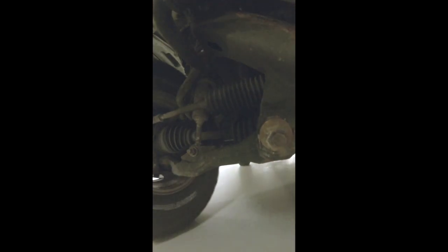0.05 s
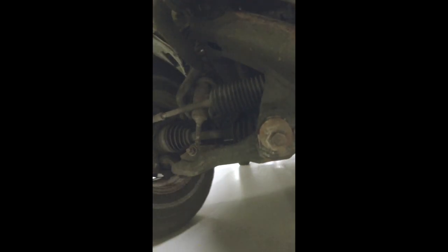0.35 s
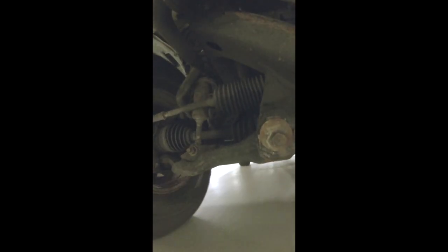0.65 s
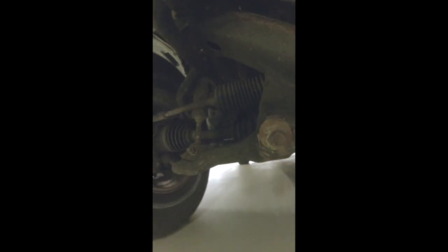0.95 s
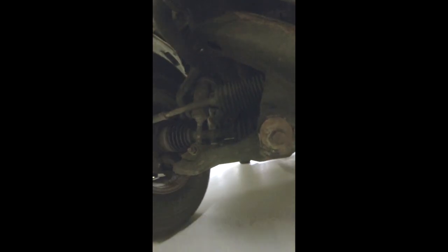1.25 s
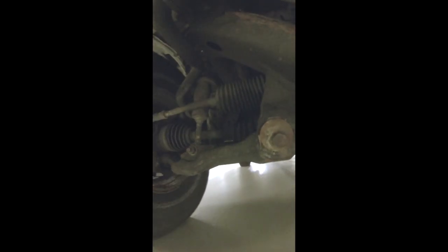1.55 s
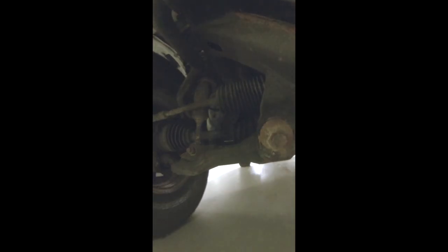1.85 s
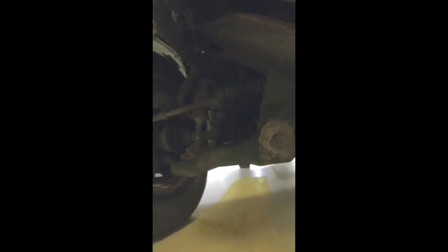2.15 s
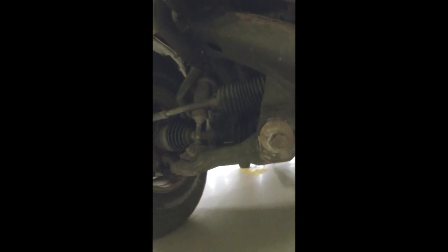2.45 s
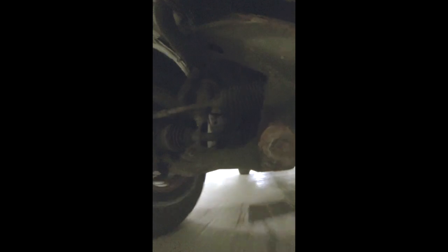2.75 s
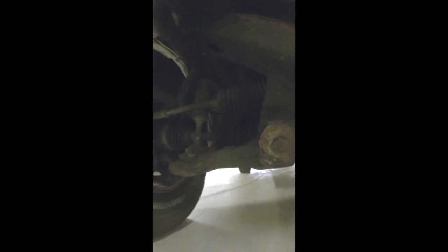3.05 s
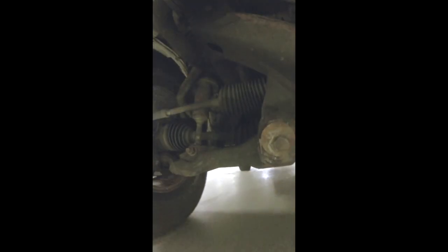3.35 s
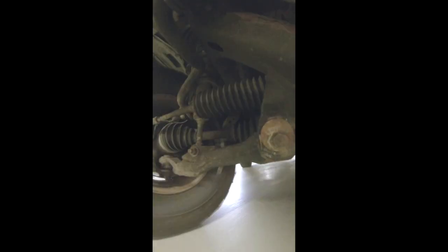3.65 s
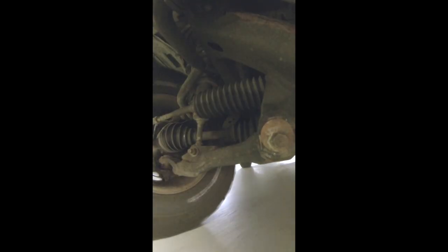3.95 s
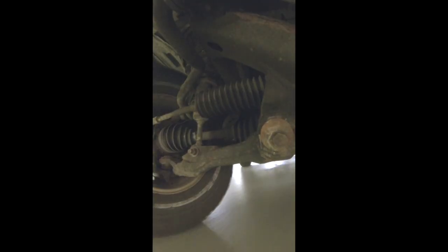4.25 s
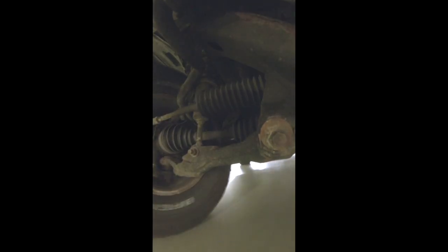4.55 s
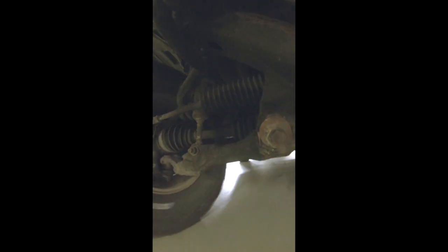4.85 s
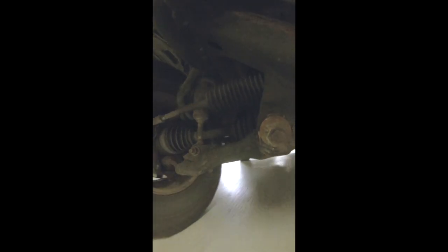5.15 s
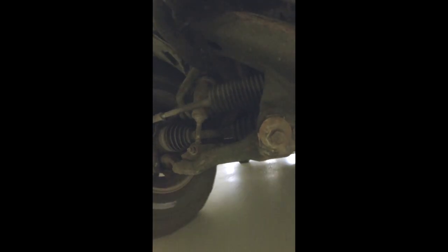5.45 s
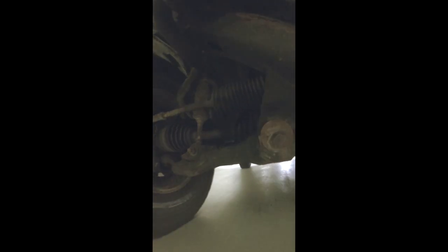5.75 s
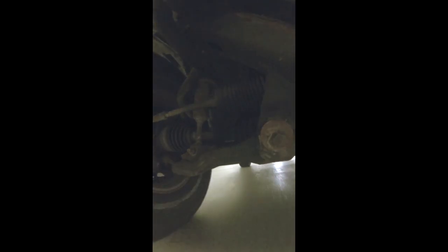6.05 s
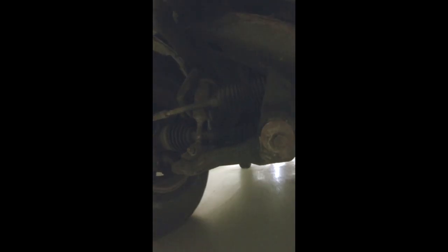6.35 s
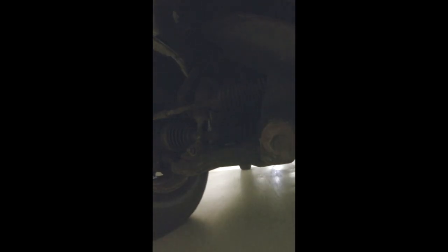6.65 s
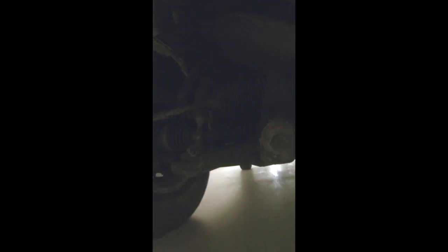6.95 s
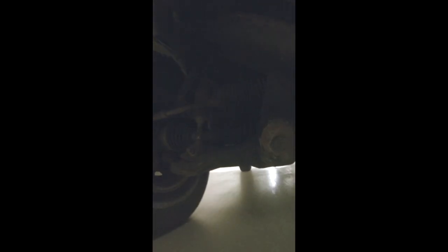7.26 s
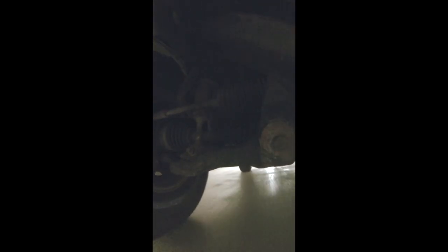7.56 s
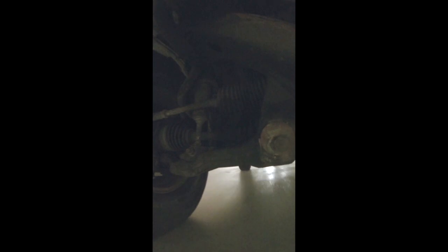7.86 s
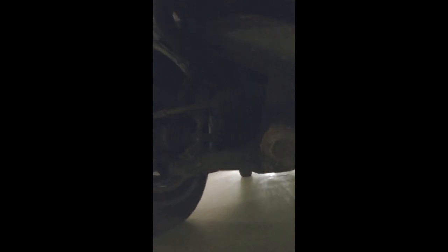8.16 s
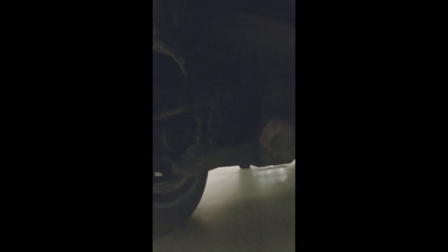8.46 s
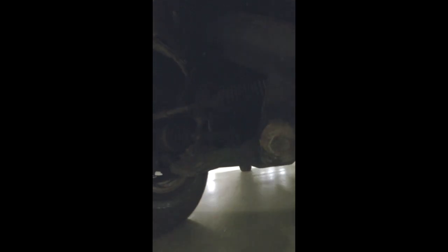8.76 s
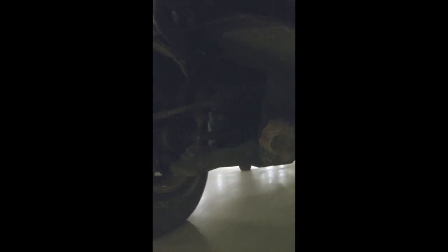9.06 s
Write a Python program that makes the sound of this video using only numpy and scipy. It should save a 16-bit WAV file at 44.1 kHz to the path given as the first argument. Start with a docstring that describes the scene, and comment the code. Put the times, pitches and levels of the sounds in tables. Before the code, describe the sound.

A car rolls around a concrete parking deck, the microphone underneath near a front wheel. Continuous tyre noise and a low engine hum, rising and falling with the throttle, carry a light whine and hiss. Five hard, briefly ringing metal clunks come from the suspension, the third and fifth loudest, making the background dip for a moment. Draughty rumbles come and go, with the deepest shudder near the end.

```python
"""A smooth concrete parking deck, heard from under the front suspension of a car driving round it.
A loose joint knocks five times, exciting the strut's modes; each hard knock makes a limiter duck everything.
The four-cylinder engine hums at multiples of its firing rate and falls in pitch at a gear change,
while its belts and gears whir, whine and hiss. The tyres roar on the concrete. Low rumbles swell over
a draught under the car; the last is a deep shudder, probably the wheel hopping."""
import sys
import numpy as np
from scipy import signal
from scipy.fft import rfft, irfft
from scipy.io import wavfile
from scipy.ndimage import uniform_filter1d, minimum_filter1d

SR = 44100
rng = np.random.default_rng(int(sys.argv[2]) if len(sys.argv) > 2 else 0)


def generate_wav(signal):
    """Clip the signal to [-1, 1] and save it as 16-bit WAV at the path in sys.argv[1]."""
    frames = np.transpose(np.atleast_2d(signal))
    scaled = np.clip(frames, -1, 1) * 32767
    pcm = np.round(scaled).astype(np.int16)
    wavfile.write(sys.argv[1], SR, pcm)


N = 410130
TIME = np.arange(N) / SR

# impacts in the joint: (time [s], peak before limiting [dB], contact cutoff [Hz], aftersound gain [dB])
IMPACTS = [(2.2663, 9.5, 2600, 2), (2.8019, 1.8, 1400, 6), (4.5134, 14, 5005, 3), (6.1374, 6, 2400, 5.5),
           (8.0451, 13, 3180, 4.5)]
# modes of the dead first blow and of the arm and strut: (frequency [Hz], level [dB], t60 [s])
BLOW_MODES = [(852, -7.5, 0.025), (1033, -5.5, 0.013), (1650, 1, 0.01), (1980, -11, 0.016),
              (4800, -20.5, 0.011)]
STRUT_MODES = [(598, -11, 0.15), (845, -10.5, 0.032), (1051, -4.5, 0.13), (1292, -11.5, 0.083),
               (1480, -37, 0.11), (1568, -16, 0.28), (1683, -2, 0.098), (1860, -9.5, 0.26),
               (1858, -16, 0.4), (2000, -10, 0.19), (2070, -7, 0.13), (2450, -15, 0.16), (2960, -17, 0.12),
               (3080, -21, 0.13), (3520, -14.5, 0.18), (4360, -28, .11), (4970, -35, .15)]
# engine speed, with a gear change at 3.6 s: (time [s], firing rate [Hz])
FIRING_RATE = [(0, 53.1), (1.35, 70.23), (1.7, 72.94), (2.18, 73.72), (3.3, 62.1), (3.52, 63), (3.66, 45),
               (3.98, 44.17), (4.4, 36.53), (4.72, 36.19), (5.25, 44.5), (5.6, 52.15), (5.8, 64.64),
               (5.97, 66.1), (6.95, 50.08), (8.2, 37.78), (9.3, 37.46)]
# throttle presses: (start [s], end [s], exhaust lift [dB], extra gain of the fundamental [dB])
PRESSES = [(0.0, 0.22, 12, 0.5), (0.323, 0.55, 12.5, 8), (0.803, 1.563, 14, 0.5), (3.773, 4.66, 13.5, -15),
           (4.86, 5.618, 14, -1), (6.51, 6.84, 14.5, -7)]
# exhaust harmonics 1-3: (level [dB], share of the lift [ratio], coasting rise above idle [dB/Hz])
EXHAUST_HARMONICS = [(-2, 1.42, 0.2054), (1, 1.16, 0.0273), (-2.5, 1.06, 0.5989)]
# weaker exhaust tones: (multiple of the firing rate [ratio], relative level [dB])
EXHAUST_OVERTONES = [(1.5, -7.5), (2.5, -19.5), (3.5, -16.5), (4, -11.5), (5, -10.5)]
# response of the car body to harmonics 1-3: (frequency [Hz], gain [dB])
BODY_RESPONSE = [(36, -11), (44, -7), (51, -1.5), (58, 2.5), (66, -.5), (73, 0), (85, -3.5), (103, 0.5),
                 (132, 1), (150, -5), (170, -8.5), (192, -6), (220, -18.5)]
# tones of the belt drive and gears: (multiple of the firing rate [ratio], relative level [dB])
WHINE_ORDERS = [(11, 1.5), (13, -2), (24, -5), (26.5, -32), (28, -8), (29.7, -9), (32, -6.5), (35, -6),
                (37, -10), (39, -4.5)]
# loudness of the engine bay: (time [s], whir gain [dB], hiss gain [dB])
BAY_GAINS = [(0, -23.5, -37.5), (0.3, -22.5, -38.5), (0.65, -25, -40.5), (1.35, -24.5, -39.5),
             (2.2, -19.5, -34), (2.6, -22, -37), (3.6, -20.5, -35), (4.6, -23, -40.5), (5.25, -21.5, -40.5),
             (5.52, -25, -40), (5.74, -20, -35.8), (6.1, -19, -33.5), (7.05, -20, -35.5), (8.6, -26, -40),
             (9.3, -23, -37)]
# the road under the tyres: (time [s], tread roar gain [dB], slab drumming gain [dB])
ROAD_GAINS = [(0, -21, -23), (0.7, -24.5, -25), (1.3, -23, -25.5), (2, -19.5, -26), (2.45, -21, -26.5),
              (3.5, -21.5, -26.5), (4.7, -25, -25), (5.3, -22.5, -20), (6.1, -20.5, -25.5),
              (7.5, -17.5, -24), (8, -17, -27.5), (8.4, -19.5, -39), (9.3, -18.5, -32)]
# low rumbling swells under the car, the last a deep shudder, probably the wheel hopping:
# (centre time [s], half-width [s], gain [dB], cutoff [Hz])
RUMBLE_SWELLS = [(2.05, 0.34, -27, 50), (3.022, .24, -15, 55), (3.8, 0.62, -26, 170),
                 (5.05, .3, -19.5, 200), (5.9, .3, -23, 60), (6.302, 0.27, -19, 150),
                 (7.657, .6, -17.5, 110), (8.25, 0.19, -9, 45.03)]
# gear tone of the final drive, following road speed: (time [s], frequency [Hz], gain [dB])
FINAL_DRIVE_TONE = [(0, 1620, -12), (3.75, 1590, -6), (4.9, 1680, 8), (5.6, 1650, -4), (6.4, 1660, -18),
                    (7, 1712, 2), (7.8, 1690, 7), (8.45, 1685, 4), (9.3, 1775, 5)]
# noise spectra: (frequency [Hz], relative spectral density [dB])
CLATTER_SPECTRUM = [(150, 0), (400, -25), (650, 0), (1000, -4), (1900, -5.5), (2600, -7), (3500, -11),
                    (5000, -16), (7000, -23), (14000, -33)]  # parts rattling around the joint
WHIR_SPECTRUM = [(600, -27), (1200, -10), (1450, -8.5), (1720, 0), (1910, -4), (2080, -2), (2350, -4),
                 (2650, -9.5), (3000, -7), (3800, -17.5), (4500, -25.5), (7000, -40)]  # engine bay
ROAR_SPECTRUM = [(120, 1.5), (200, -4.5), (310, -6.5), (430, -2.5), (560, -1.5), (660, -1), (712, 2.5),
                 (780, -1.5), (840, 0), (930, -5), (1040, -4), (1300, -10.5), (2200, -17)]  # tread on concrete
DRUM_SPECTRUM = [(40, -15), (60, 1), (73, -13), (88, -7), (125, 3.5), (170, -8), (250, -12)]  # tyres on the slabs
RUMBLE_SPECTRUM = [(8, -29), (20, -3), (30, -9), (45, -7), (70, -9), (120, -18), (200, -25.5), (400, -31)]  # draught and swells under the car
HISS_SPECTRUM = [(2500, -7), (3800, 4.5), (4400, -3.5), (5150, 1.5), (5900, -9), (6400, -6), (7000, -17.5),
                 (7500, -16.5), (8440, -2), (9400, -14), (10450, -8.5), (11800, -17.5), (14000, -19),
                 (15300, -27)]  # belts and air


def knocks(ring_db=-12, clatter_db=-22, clatter_t60=0.21, deck_db=-35, deck_t60=0.29, spread_s=0.00083):
    """Impact excitation: the joint takes up its play with a dead blow, then ring, clatter and deck echo."""
    t = np.arange(SR // 2) / SR
    fade = -np.log(1000) * t
    out = np.zeros(N + SR)
    for start, peak_db, cutoff_hz, aftersound_db in IMPACTS:
        strut = amp(ring_db) * ring(STRUT_MODES, t, scatter=0.92)
        tail = amp(clatter_db) * np.exp(fade / clatter_t60) + amp(deck_db) * np.exp(fade / deck_t60)
        aftersound = strut + tail * colour(rng.standard_normal(len(t)), CLATTER_SPECTRUM)
        aftersound *= 1 - np.exp(-t / spread_s)  # the shock takes a moment to reach nearby parts
        softness = signal.butter(2, cutoff_hz, fs=SR)  # a softer contact excites less treble
        knock = signal.lfilter(*softness, ring(BLOW_MODES, t) + amp(aftersound_db) * aftersound)
        out[round(start * SR):][:len(t)] += amp(peak_db) * knock / abs(knock).max()
    return out[:N]


def ring(modes, t, scatter=0):
    """Modal superposition: a sum of damped sinusoids, with phases scattered by up to `scatter` cycles."""
    out = np.zeros(len(t))
    for k, (hz, db, t60) in enumerate(modes):
        phase = k / 2 + scatter * rng.random()
        out += amp(db) * np.sin(2 * np.pi * (hz * t + phase)) * np.exp(-np.log(1000) * t / t60)
    return out


def exhaust(hz, cycles, gain_db=-32.5, idle_hz=38.2, boom_db=4, muffler_hz=270, overtone_db=-2.5):
    """Forced vibration: firing harmonics drive the body's resonances; uneven cylinders add half orders."""
    lift_db, fundamental_db = throttle()
    out = np.zeros(N)
    for k, (db, share, db_per_hz) in enumerate(EXHAUST_HARMONICS, 1):
        drive_db = np.maximum(share * lift_db, db_per_hz * (hz - idle_hz)) + fundamental_db * (k == 1)
        body_db = np.interp(k * hz, *np.transpose(BODY_RESPONSE))
        level_db = db + drive_db + body_db + wander(4.7)
        out += amp(level_db) * np.sin(2 * np.pi * (k * cycles + rng.random()))
    for multiple, db in EXHAUST_OVERTONES:
        body_db = boom_db * resonance(multiple * hz, centre_hz=73.6, width_hz=30)
        muffler = 1 / np.sqrt(1 + (multiple * hz / muffler_hz) ** 10)
        level_db = lift_db + overtone_db + db + body_db + 2 * wander(4.1)
        out += muffler * amp(level_db) * np.sin(2 * np.pi * (multiple * cycles + rng.random()))
    return amp(gain_db) * out


def throttle(press_s=0.28, release_s=0.34):
    """Engine load: each press ramps the exhaust's level up and back and reweights its fundamental."""
    lift_db, fundamental_db, overlap = np.zeros((3, N))
    for start, end, db, extra_db in PRESSES:
        pedal = np.clip(1 + np.minimum((TIME - start) / press_s, (end - TIME) / release_s), 0, 1)
        lift_db = np.maximum(lift_db, db * pedal)
        fundamental_db += extra_db * pedal
        overlap += pedal
    return lift_db, fundamental_db / np.maximum(overlap, 1)


def engine_bay(hz, cycles, throb=0.048, flutter_db=0.95, waver_db=1.6, singing_db=-6, full_whine_hz=60):
    """Resonance: a throbbing whir sets the housing singing, and belt and gear tones swell near its peak."""
    whir = colour(rng.standard_normal(N), WHIR_SPECTRUM)
    whir *= (1 + throb * np.cos(2 * np.pi * cycles)) * amp(flutter_db * wander(29))
    housing_mode = resonance(np.fft.rfftfreq(N, 1 / SR), centre_hz=1913, width_hz=56)
    singing = unit_rms(irfft(rfft(whir) * housing_mode, N))
    whine = np.zeros(N)
    for multiple, db in WHINE_ORDERS:
        housing = 0.088 + resonance(multiple * hz, centre_hz=1890, width_hz=410)
        gain = housing * amp(db + waver_db * wander(10))
        whine += gain * np.sin(2 * np.pi * (multiple * cycles + 0.057 * wander(5)))
    whine *= np.minimum(hz / full_whine_hz, 1) ** 2
    return amp(-1.93) * whir + amp(singing_db + 2 * wander(3.3)) * singing + whine


def tyres(grit_per_s=500, grit_db=-11, patchy_db=0.84):
    """Roughness excitation: the tread roars on concrete, grit snaps under it and the slabs drum."""
    roar_db, drum_db = curves(ROAD_GAINS)
    grit = (rng.random(N) < grit_per_s / SR) * rng.standard_normal(N)
    contact = rng.standard_normal(N) + amp(grit_db) * unit_rms(grit)
    roar = colour(contact, ROAR_SPECTRUM) * amp(patchy_db * wander(18))
    drumming = colour(rng.standard_normal(N), DRUM_SPECTRUM)
    return amp(roar_db - 0.57) * roar + amp(drum_db) * drumming


def underbody_rumble(draught_db=-32, rise_db_per_s=1.3, lumpy_db=2.3, swell_db=2.0):
    """Modulated noise: a lumpy draught grows under the car while low rumbles swell and fade."""
    rumble = colour(rng.standard_normal(N), RUMBLE_SPECTRUM)
    level_db = draught_db + rise_db_per_s * TIME + lumpy_db * wander(2.4)
    out = amp(level_db) * colour(rng.standard_normal(N), RUMBLE_SPECTRUM)
    for centre, half_width, db, cutoff_hz in RUMBLE_SWELLS:
        swell = np.exp(-2 * ((TIME - centre) / half_width) ** 2)
        out += amp(db + swell_db) * swell * signal.lfilter(*signal.butter(2, cutoff_hz, fs=SR), rumble)
    return out


def final_drive(gain_db=-12, waver_db=2, jitter_cycles=0.074):
    """Gear meshing: a faint tone that wavers in level and phase."""
    hz, load_db = curves(FINAL_DRIVE_TONE)
    cycles = np.cumsum(hz) / SR
    gain = amp(gain_db + load_db + waver_db * wander(7.5))
    return gain * np.sin(2 * np.pi * (cycles + jitter_cycles * wander(14)))


def hiss(cycles, throb=0.1, flutter_db=1.0):
    """Amplitude modulation: belt and air noise, coloured by the microphone's port, throbs with the firing."""
    rush = colour(rng.standard_normal(N), HISS_SPECTRUM)
    return rush * (1 + throb * np.cos(2 * np.pi * cycles)) * amp(flutter_db * wander(30))


def resonance(hz, centre_hz, width_hz):
    """Resonance curve: gain 1 at the centre, half power at half the width to either side."""
    return 1 / np.sqrt(1 + (2 * (hz - centre_hz) / width_hz) ** 2)


def colour(x, spectrum):
    """Spectral shaping to rms 1: the response falls 20 dB in the octave past each end, then stops."""
    hz, db = np.transpose(spectrum)
    hz = np.r_[hz[0] / 2, hz, hz[-1] * 2]
    db = np.r_[db[0] - 20, db, db[-1] - 20]
    bin_hz = np.fft.rfftfreq(len(x), 1 / SR)
    gain_db = np.interp(np.log(bin_hz + 1), np.log(hz), db, -np.inf, -np.inf)
    return unit_rms(irfft(rfft(x) * amp(gain_db), len(x)))


def wander(rate_hz):
    """Random fluctuation: noise of rms 1, low-passed at rate_hz."""
    hz = np.fft.rfftfreq(N, 1 / SR)
    return unit_rms(irfft(rfft(rng.standard_normal(N)) / (1 + (hz / rate_hz) ** 2), N))


def curves(rows):
    """Linear interpolation of a table's columns over time."""
    times, *columns = np.transpose(rows)
    return [np.interp(TIME, times, column) for column in columns]


def amp(db):
    """Amplitude ratio of a level in decibels."""
    return 10 ** (np.asarray(db) / 20)


def unit_rms(x):
    """Normalisation to rms 1."""
    return x / np.sqrt(np.mean(x ** 2) + 1e-20)


def scene(speed_jitter=0.00194):
    """Superposition: knocks, engine, tyres and rumble add at one microphone."""
    hz, = curves(FIRING_RATE)
    whir_db, hiss_db = curves(BAY_GAINS)
    cycles = np.cumsum(hz * (1 + speed_jitter * wander(12.6))) / SR
    road = tyres()
    engine = exhaust(hz, cycles)
    engine += amp(whir_db - 1.76) * (engine_bay(hz, cycles) + final_drive())
    engine += amp(hiss_db) * hiss(cycles)
    return (underbody_rumble() + road + engine + knocks())[None]


def record(dry, ceiling_db=0.2, hold_s=0.16, release_s=0.52, block_samples=768, cutoff_hz=15400):
    """Peak limiting: the gain drops for a loud block, holds and recovers; clipping and a low-pass follow."""
    block = (np.arange(N) + 693) // block_samples  # the first block is a short one
    block_starts = np.flatnonzero(np.diff(block, prepend=-1))
    peak = np.maximum.reduceat(abs(dry[0]), block_starts)
    over_db = np.maximum(20 * np.log10(peak + 1e-9) - ceiling_db, 0)
    block_s = np.arange(len(peak)) * block_samples / SR
    age = block_s[:, None] - block_s
    remaining = (age >= 0) * np.exp(-np.maximum(age - hold_s, 0) / release_s)
    duck_db = (over_db * remaining).max(axis=1)
    # the gain glides down just before the block begins
    gain_db = uniform_filter1d(minimum_filter1d(-duck_db[block], size=60), size=60)
    clipped = np.clip(dry * amp(gain_db), -1, 1)
    low_pass = signal.firwin(511, cutoff_hz, window=("kaiser", 9), fs=SR)
    return signal.oaconvolve(clipped, low_pass[None], "same", axes=1)


dry = scene()
out = record(dry)
generate_wav(out)
```